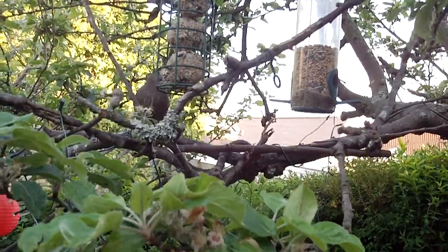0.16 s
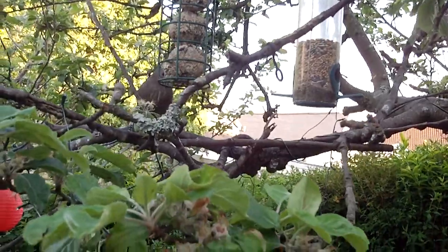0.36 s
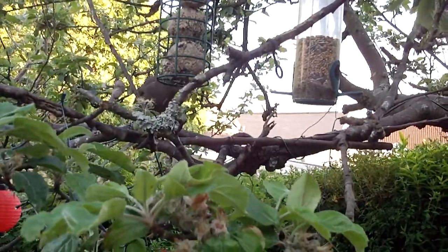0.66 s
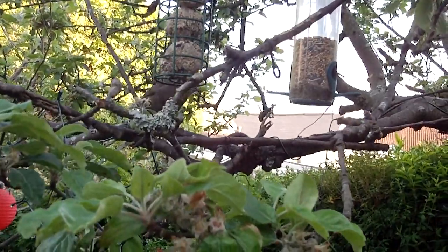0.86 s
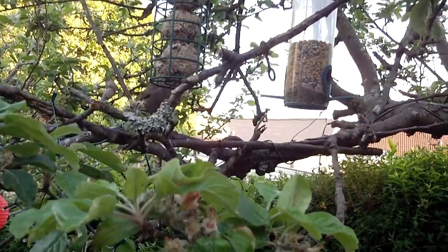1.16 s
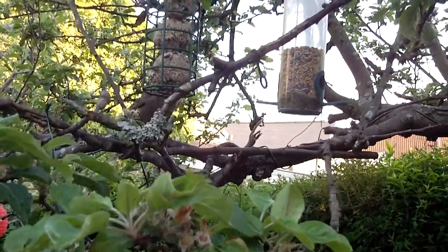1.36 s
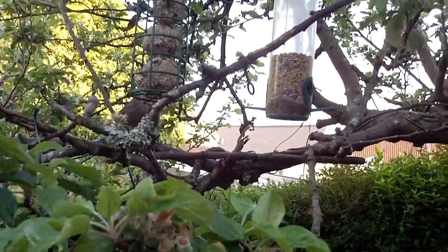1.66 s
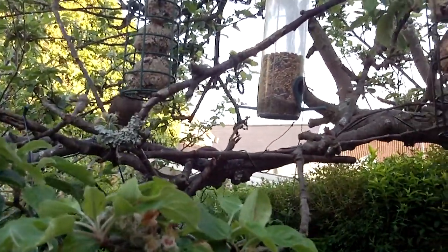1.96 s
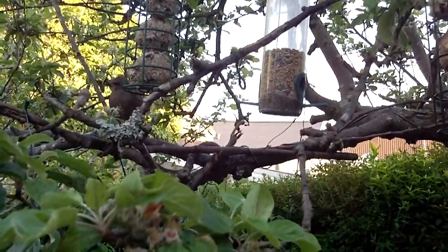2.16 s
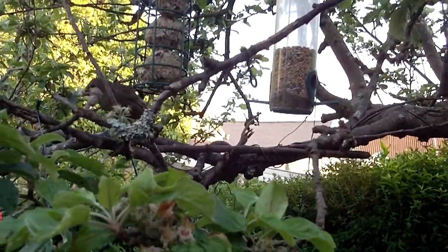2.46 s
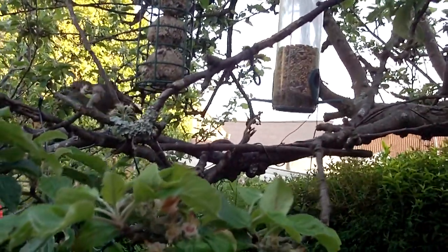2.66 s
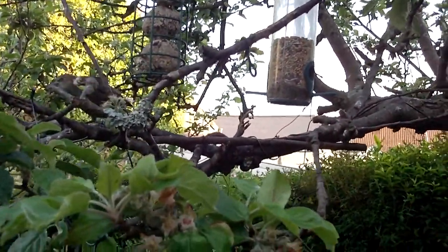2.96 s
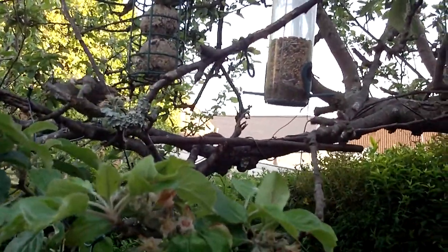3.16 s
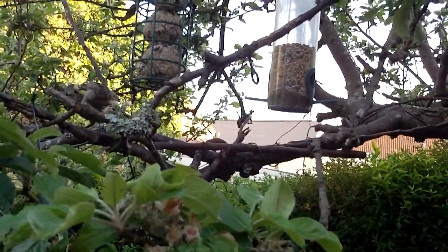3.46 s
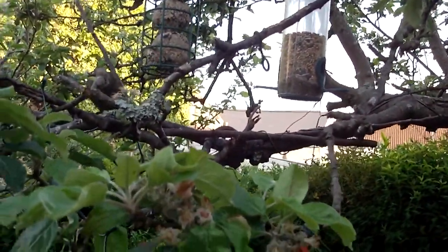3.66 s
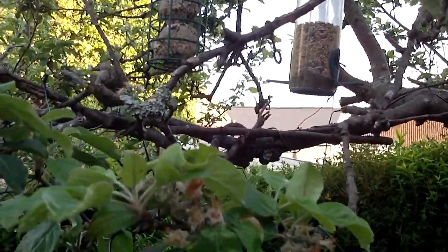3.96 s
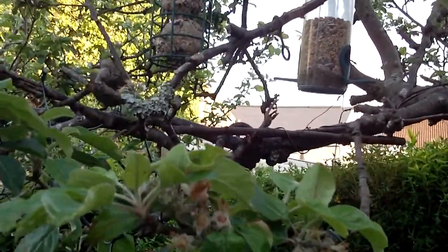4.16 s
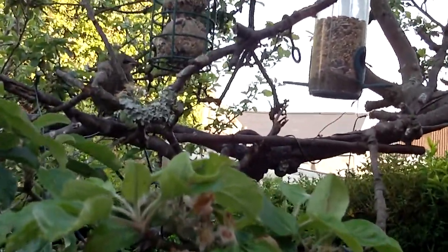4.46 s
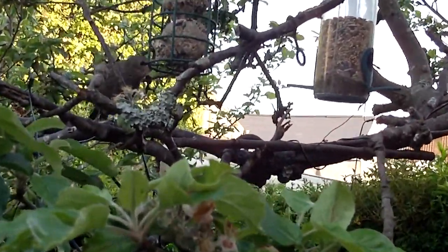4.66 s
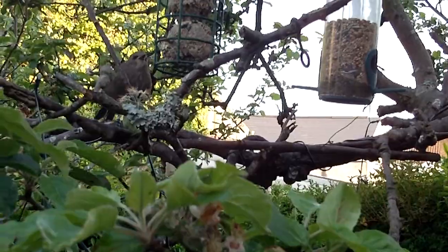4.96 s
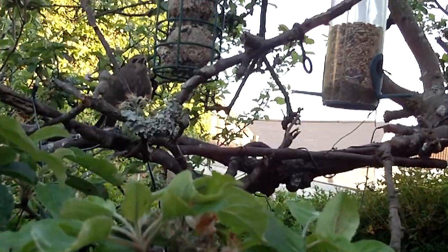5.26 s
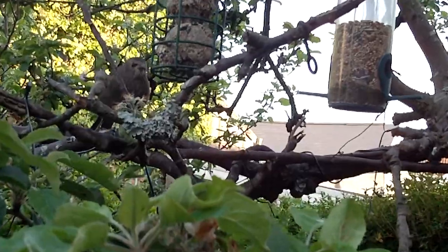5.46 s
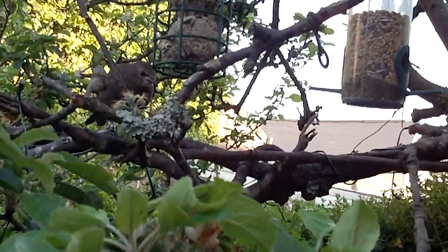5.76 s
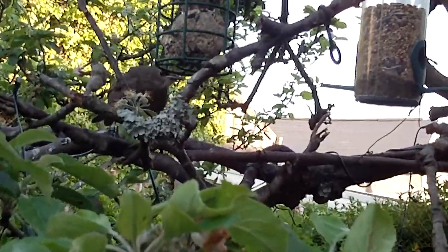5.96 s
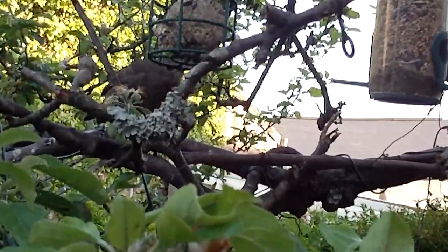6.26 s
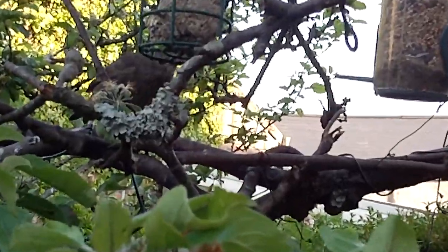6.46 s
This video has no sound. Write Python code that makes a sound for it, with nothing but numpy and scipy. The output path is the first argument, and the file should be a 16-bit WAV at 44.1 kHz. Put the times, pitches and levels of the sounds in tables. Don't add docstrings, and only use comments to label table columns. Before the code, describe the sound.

In a quiet garden, a distant sparrow chirps at once, then light taps begin. Two short solid knocks follow, low and damped, then four much harder hollow plastic cracks, spaced unevenly and overloading the close microphone. A far slam, two more faint chirps and a brief leafy brush come between them. Hand rumble, dim traffic, easing breeze and electronic hiss run underneath.

```python
import sys
import numpy as np
from scipy import signal
from scipy.fft import rfft, irfft
from scipy.io import wavfile
from scipy.ndimage import uniform_filter1d

SR = 44100
rng = np.random.default_rng(int(sys.argv[2]) if len(sys.argv) > 2 else 0)


def attenuation_scalar(level_db):
    decades = np.asarray(level_db, float) / 20
    return 10 ** decades


def put_to_file(sound):
    columns = np.atleast_2d(sound).T
    safe = np.clip(columns, -1, 1)
    whole_steps = np.round(safe * 32767)
    wavfile.write(sys.argv[1], SR, whole_steps.astype(np.int16))


N = 291060
T = np.arange(N) / SR


def rms_one(x):
    return x / np.sqrt(np.mean(x ** 2) + 1e-20)


def in_time(rows):
    s, db = np.transpose(rows)
    return np.interp(T, s, db)


def band(x, low_hz, high_hz):
    return signal.sosfilt(signal.butter(2, [low_hz, min(high_hz, 19000)], "band", fs=SR, output="sos"), x)


def band_noise(low_hz, high_hz):
    return rms_one(band(rng.standard_normal(N), low_hz, high_hz))


def drift(rate_hz):
    r = np.exp(-80 * np.pi * rate_hz / SR)
    slow = signal.lfilter([1], [1, -2 * r, r * r], rng.standard_normal(N // 40 + 2002))
    slow = rms_one(slow[2000:])
    return np.interp(np.arange(N) / 40, np.arange(len(slow)), slow)


def puff(s, t60_s):
    return (T >= s) * attenuation_scalar(-60 * np.maximum(T - s, 0) / t60_s)


# f/Hz, likeness/0..1
LIKENESS = [(60, .9999), (180, 0.97), (550, 0.95), (1650, 0.98), (4970, 0.93), (15000, .55)]


def coloured(spectrum):
    log_hz = np.log(np.maximum(np.arange(N // 2 + 1) * SR / N, 1))

    def at(points):
        hz, value = np.transpose(points)
        return np.interp(log_hz, np.log(hz), value)

    alike = np.clip(at(LIKENESS), 0, 1)
    mid, side = rfft(rng.standard_normal((2, N))) * attenuation_scalar(at(spectrum))
    left_right = np.sqrt(1 + alike) * mid + np.sqrt(1 - alike) * side * [[1], [-1]]
    return rms_one(irfft(left_right, N))


def strike(out, s, hz, t60_s, swing, press_s):
    creep = .07
    at = np.arange(max(int((s - .01) * SR), 0), min(int((s + 0.69) * SR), N))
    after = np.maximum(T[at] - s, 0)[:, None]
    rings = np.cos(2 * np.pi * hz * after) * attenuation_scalar(-60 * after / t60_s) @ swing
    before = np.minimum(T[at] - s, 0) / press_s
    push = (1 - creep) * np.exp(1.15 * before) + creep * np.exp(before / 3.5)
    out[at] += rings * push


def knocks(modes, blows):
    wire_hz, wire_t60_s = 421, .45
    out = np.zeros(N)
    for s, spot, db, press_s, wire_db in blows:
        hz, t60_s, swing = np.transpose(modes[spot])
        swings = np.r_[attenuation_scalar(db) * swing, attenuation_scalar(wire_db)]
        strike(out, s, np.r_[hz, wire_hz], np.r_[t60_s, wire_t60_s], swings, press_s)
    return out


# f/Hz, t60/s, signed swing
SHELL_MODES = [
    [(49, 0.035, 0.855), (633, 0.033, -0.207), (686, 0.034, 1.022), (723, 0.035, 0.838), (877, 0.024, 2.122), (1040, 0.025, -0.486), (1147, 0.047, 0.159), (1258, 0.029, -1.243), (1345, 0.026, -1.672), (1689, 0.016, -0.52)],
    [(48, 0.052, -0.296), (614, 0.033, 0.136), (670, 0.032, -1.44), (726, 0.044, 0.256), (865, 0.033, -0.532), (1135, 0.028, -0.362), (1109, 0.015, 0.71), (1262, 0.014, 0.497), (1582, 0.014, 0.12), (2200, 0.007, 0.35)],
]
# t/s, spot (0 rim, 1 face), level/dB, press/s, wire level/dB
SHELL_KNOCKS = [
    (3.6403, 0, 0, .00064, -34),
    (4.5455, 1, 1.2, .0006, -34),
    (5.0600, 0, -1.2, .0005, -36),
    (6.5286, 1, 1.8, .00055, -34),
]


def shell_knocks():
    return knocks(SHELL_MODES, SHELL_KNOCKS)


# f/Hz, t60/s, signed swing
GRIP_MODES = [
    [(67, 0.026, -0.5), (136, 0.069, 0.556), (171, 0.17, -0.29), (241, 0.052, 0.544), (325, 0.054, 0.54), (437, 0.053, -0.646), (551, 0.027, 1.033), (572, 0.067, -0.415), (721, 0.039, 0.097), (857, 0.089, -0.014), (792, 0.044, 0.082), (1077, 0.05, 0.188), (1176, 0.019, 0.1), (1546, 0.011, 0.16)],
    [(67, 0.037, -0.074), (146, 0.036, 0.821), (182, 0.153, -0.298), (230, 0.019, 1.005), (316, 0.018, -0.97), (476, 0.029, 0.421), (548, 0.033, -0.693), (602, 0.051, 0.219), (673, 0.05, -0.171), (770, 0.059, -0.081), (911, 0.041, -0.129), (1019, 0.07, -0.031), (1185, 0.033, -0.044), (1214, 0.011, 0.127)],
]
# t/s, spot (0 firm, 1 glancing), level/dB, press/s, wire level/dB
GRIP_KNOCKS = [
    (1.4429, 0, -.4, .00045, -60),
    (2.4460, 1, 0, .0001, -60),
]


def grip_knocks():
    return band(knocks(GRIP_MODES, GRIP_KNOCKS), 8, 5300)


# t/s, peak level/dB, ring f/Hz, shell rattle level/dB
TAPS = [(0.575, -34, 160, -30), (0.66, -34, 140, -30), (0.70, -41, 120, -30), (0.555, -37.5, 880, -8),
        (0.931, -21.5, 464, -29), (0.967, -35, 428, -1), (1.874, -44, 444, -9), (1.914, -23.5, 460, -24),
        (1.941, -28, 670, -7), (2.507, -41.5, 926, 0), (2.61, -37.5, 774, -15), (2.635, -38, 810, -11),
        (2.972, -28, 431, -23), (2.992, -25, 460, -19), (3.018, -36, 670, -1), (3.729, -37, 431, -7)]
TOUCHES = [
    (1.4375, -25, 330, -20),
    (1.453, -27, 960, 0),
    (1.462, -31, 900, 0),
    (1.498, -40, 850, -6),
    (2.4405, -24, 330, -20),
    (2.972, -36, 900, -3),
    (2.9955, -28, 450, -14),
    (3.706, -44, 1300, -6),
    (3.719, -44, 1320, -6),
]
RATTLE_HZ = [670, 796, 894, 1080, 1328]


def taps():
    out, rows = np.zeros(N), TAPS + TOUCHES
    uneven_db = rng.normal(0, 3.0, (len(rows), 5))
    for (s, db, ring_hz, rattle_db), uneven in zip(rows, uneven_db):
        rattle = .5 * attenuation_scalar(rattle_db + uneven) * [1, -1, 1, -1, 1]
        swing = attenuation_scalar(db) * np.r_[.7, .4, rattle]
        hz = np.r_[ring_hz, 110, RATTLE_HZ]
        t60_s = np.r_[.04, .04, [.035] * len(RATTLE_HZ)]
        strike(out, s + .001, hz, t60_s, swing, .0007)
    return out


# t/s, level/dB, centre f/Hz, width/octaves, t60/s
TICKS = [(.7855, -56, 5400, .5, .03), (1.1297, -41, 7900, 0.88, 0.0073), (1.687, -53, 5900, .4, 0.015),
         (2.4462, -35, 3200, 1.3, 0.0052), (2.672, -52, 7240, .4, .04), (3.695, -50.5, 7000, .25, .06),
         (3.715, -50, 6940, 0.35, .03), (3.901, -36, 5390, 1.46, 0.009), (4.3427, -49.5, 12080, .5, 0.011),
         (3.6405, -27, 11910, 0.95, 0.014), (5.06, -25, 11000, 1.25, 0.011),
         (4.5457, -28, 4200, 1.57, .006), (6.5288, -27.5, 4200, 1.9, 0.0075), (1.455, -52, 6900, .3, .08),
         (1.56, -56.5, 5880, 0.42, .2), (5.6687, -49, 8030, .8, .015), (6.148, -45.5, 6810, 0.53, 0.1),
         (6.3275, -52.5, 5510, .3, 0.021), (6.332, -52, 7100, .3, 0.079)]


def ticks():
    white, out = rng.standard_normal(N), np.zeros(N)
    for s, db, hz, octaves, t60_s in TICKS:
        low_hz, high_hz = hz / 2 ** (octaves / 2), hz * 2 ** (octaves / 2)
        noise = rms_one(band(band(white, low_hz, high_hz), low_hz, high_hz))
        out += attenuation_scalar(db) * noise * puff(s, max(t60_s, .003))
    return out


# top t/s, rise/s, fall/s, top f/Hz, level/dB
CHIRP = [
    (.003, .012, .008, 6200, -9),
    (.06, .012, .004, 6200, -12),
    (.035, .035, .018, 4550, -2.5),
    (.036, .016, .012, 5144, -1),
    (.07, .012, 0.0087, 4500, -3.5),
    (.098, .02, 0.018, 3850, 3),
    (.127, .006, 0.014, 3680, -3.5),
    (.152, 0.0043, .018, 3780, -7),
    (.186, .006, 0.016, 3600, -11),
]
# t/s, level/dB
CHIRPS = [
    (.003, -51.5),
    (3.95, -49),
    (4.991, -48.5),
]


def garden_echo(x):
    t60_s = 0.62
    tail = T[:SR // 2]
    echoes = rng.standard_normal((2, len(tail))) * [[1], [.15]] * attenuation_scalar(-60 * tail / t60_s) * (tail > .012)
    mid, side = signal.fftconvolve([x], echoes / np.linalg.norm(echoes[0]), axes=1)[:, :N]
    return mid + side * [[1], [-1]]


def sparrow():
    rise_hz_per_s, fall_hz_per_s, rise_db_per_s, fall_db_per_s = 36000, 60000, 250, 197.5
    out = np.zeros(N)
    for start, db in CHIRPS:
        for s, rise, fall, top_hz, note_db in CHIRP:
            top = start + s
            at = np.arange(int(max(top - rise, 0) * SR), int((top + fall) * SR))
            early, late = np.maximum(top - T[at], 0), np.maximum(T[at] - top, 0)
            hz = top_hz - rise_hz_per_s * early - fall_hz_per_s * late
            phase = 2 * np.pi * np.cumsum(hz) / SR
            level_db = db + note_db - rise_db_per_s * early - fall_db_per_s * late
            out[at] += attenuation_scalar(level_db) * np.sin(phase) * signal.windows.tukey(len(at), .4)
    direct = out * (1 + .55 * band_noise(150, 700))
    return direct + garden_echo(direct)


# (f/Hz, density/dB)
SLAM = (3.906, -38.5, 0.15, [(200, -11), (400, 6), (620, -12), (900, -1.5), (1400, -15), (1900, -6),
        (2500, -16), (3200, -32)])


def far_slam():
    s, db, t60_s, spectrum = SLAM
    return attenuation_scalar(db) * puff(s, t60_s) * coloured(spectrum)


# t/s, level/dB
RUSTLE = [
    (4.77, -90.5),
    (4.785, -58.5),
    (4.835, -58.5),
    (4.85, -92.5),
]


def wing_rustle():
    return attenuation_scalar(in_time(RUSTLE)) * band_noise(5000, 15000)


# t/s, level/dB
HAND = [(0.0, -46.5), (0.64, -42), (0.86, -42), (1.36, -43.5), (1.76, -42), (2.02, -41.5), (2.48, -42.5),
        (2.79, -34.5), (3.01, -41.5), (3.53, -43), (3.69, -38), (4.69, -44.5), (4.83, -39.5), (5.02, -36),
        (5.84, -42.5), (6.6, -47.5)]
# f/Hz, density/dB
RUMBLE = [(15, -5.5), (25, -3), (38, 0), (44, -2.5), (52, -9.5), (62, -21.5), (100, -42.5)]


def hand_rumble():
    return attenuation_scalar(in_time(HAND) + 4.0 + 1.9 * drift(2.4)) * coloured(RUMBLE + [(200, -80.0)])


# t/s, level/dB
FINGERS = [(0.0, -57), (0.26, -56), (0.9, -52), (1.38, -54.5), (3.62, -51.5), (3.75, -56.5), (4.59, -54.5),
           (6.4, -58), (6.6, -54.5)]


def finger_handling():
    return attenuation_scalar(in_time(FINGERS) + 2.6 * drift(16)) * band_noise(56, 176)


# t/s, level/dB
BREEZE = [
    (0, -55.5),
    (1.6, -58),
    (1.9, -65.5),
    (2.5, -58),
    (3.6, -61.5),
    (5.0, -61.5),
    (6.6, -65),
]


def breeze_db():
    return in_time(BREEZE)


def leaves(wind_db):
    return attenuation_scalar(wind_db - 4.5 + 0.76 * drift(15)) * band_noise(2200, 8000)


# f/Hz, density/dB
TRAFFIC = [(150, -35), (260, -2), (291, -1), (645, -11), (899, -3), (1210, -15), (1360, -11.5), (1990, -16),
           (2500, -12), (3250, -40), (5500, -120)]


def far_traffic(wind_db):
    level_db = -60 + .5 * (wind_db - wind_db.mean())
    return attenuation_scalar(level_db + 1.4 * drift(9)) * coloured(TRAFFIC)


def far_motor():
    hz, width_hz, level_db = 236.5, 23, -65.5
    return attenuation_scalar(level_db + 2.5 * drift(1.5)) * band_noise(hz - width_hz / 2, hz + width_hz / 2)


IDLE_TURNS = [2, 4, 6, 9, 10, 14, 16, 18, 20, 23, 24, 29, 31, 34, 35, 40, 42, 44, 60, 63]


def card_writes():
    start_s, every_s, level_db, spread_db = .0632, .10011, -60.5, 1.5
    gate = np.zeros(N)
    for turn, chance in enumerate(rng.standard_normal(66)):
        if turn in IDLE_TURNS:
            continue
        s = start_s + every_s * turn
        buzz = np.abs(T - s - .012) < .012
        clicks = 2.5 * puff(s + .004, .006) + 2.5 * puff(s + .018, .006)
        gate += attenuation_scalar(level_db + spread_db * chance) * (buzz + clicks)
    return gate * band_noise(5500, 17000)


def frame_whine():
    whine_hz, frame_hz, louder_s = 11988.3, 29.97, 3.835
    idle_db, loud_db, gap_db, gap_growth_per_s = -72, -60, -14, .075
    open_share = .84 - gap_growth_per_s * np.maximum(T - louder_s, 0)
    gap = (T - 3.842) * frame_hz % 1 > open_share
    gate = uniform_filter1d(attenuation_scalar(gap_db * gap), size=200)
    level = attenuation_scalar(np.where(T < louder_s, idle_db, loud_db))
    return level * gate * np.sin(2 * np.pi * whine_hz * T)


# f/Hz, level/dB rms
SCAN_LINES = [(15585, -81), (15644, -80.5)]


def scan_lines():
    return sum(attenuation_scalar(db + 3) * np.sin(2 * np.pi * hz * T) for hz, db in SCAN_LINES)


# f/Hz, density/dB
HISS = [(180, -27.5), (300, -2.5), (400, -7), (914, -8), (3720, -14.5), (9720, -17), (12500, -16),
        (15800, -18)]


def hiss():
    return attenuation_scalar(-54.5) * coloured(HISS)


def scene():
    wind_db = breeze_db()
    blows = shell_knocks() + grip_knocks() + taps()
    events = ticks() + sparrow() + far_slam() + wing_rustle()
    hands = hand_rumble() + finger_handling()
    garden = leaves(wind_db) + far_traffic(wind_db) + far_motor()
    camera = card_writes() + frame_whine() + scan_lines() + hiss()
    return blows + events + hands + garden + camera


def top_cut(x):
    return signal.sosfilt(signal.butter(12, 15940, fs=SR, output="sos"), x)


def record(dry):
    ported = dry + .15 * np.gradient(dry, axis=1) * [[1], [-1]]
    clipped = np.clip(ported * attenuation_scalar(np.array([[.11], [-.11]])), -1, 1)
    cut = signal.sosfilt(signal.cheby2(10, 40, 16500, fs=SR, output="sos"), clipped)
    return top_cut(cut)


dry = scene()
out = record(dry)
put_to_file(out)
```